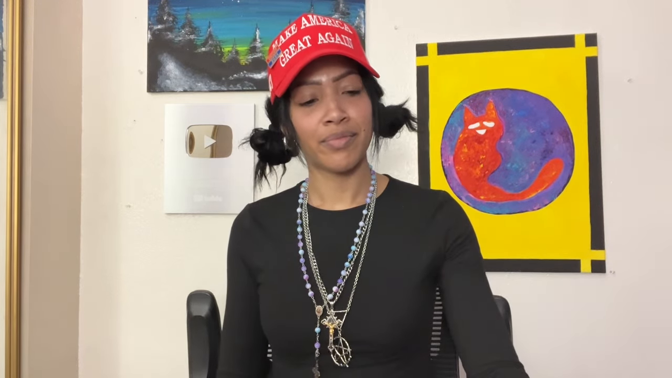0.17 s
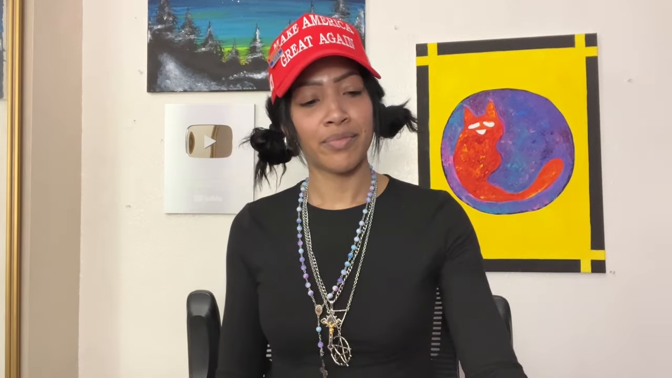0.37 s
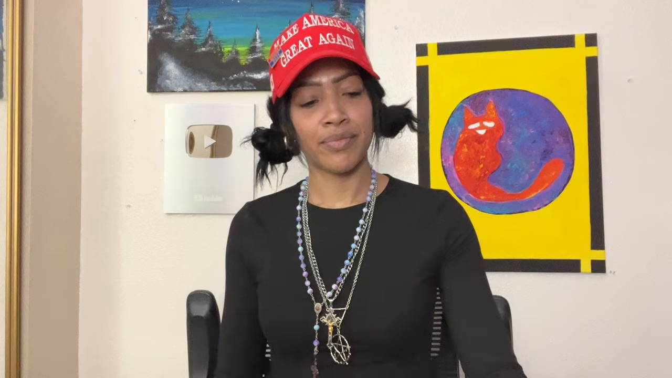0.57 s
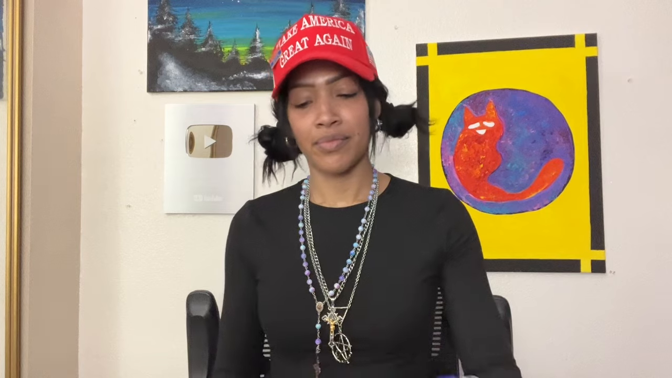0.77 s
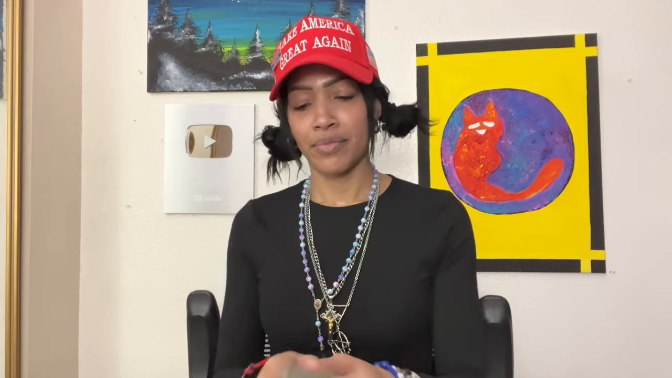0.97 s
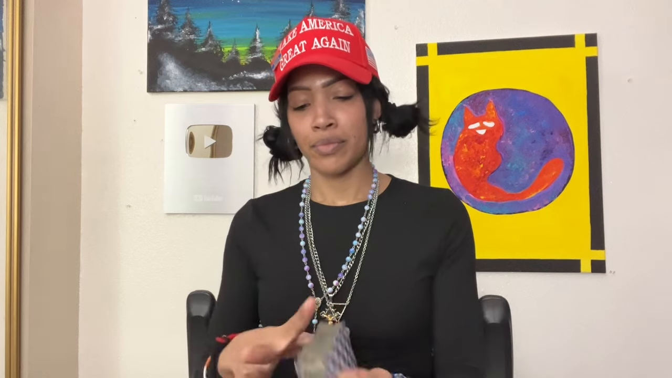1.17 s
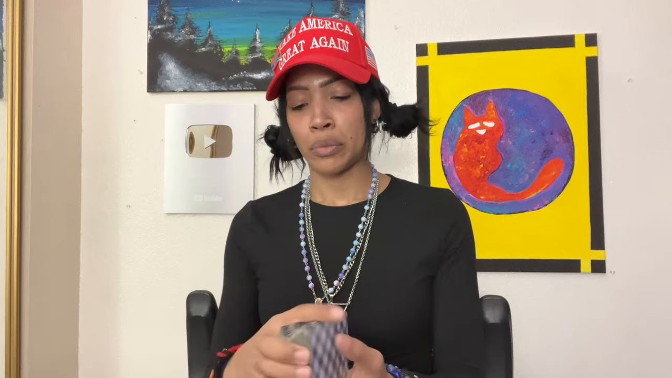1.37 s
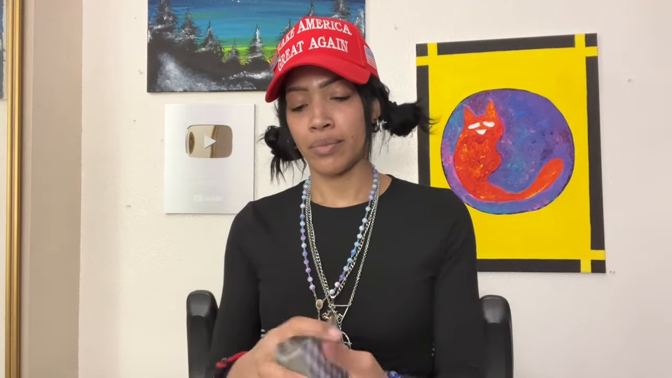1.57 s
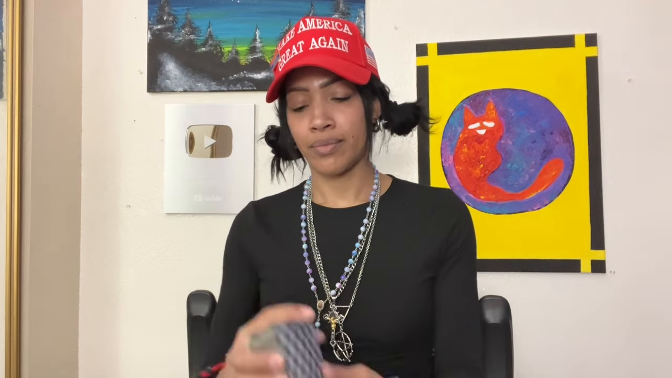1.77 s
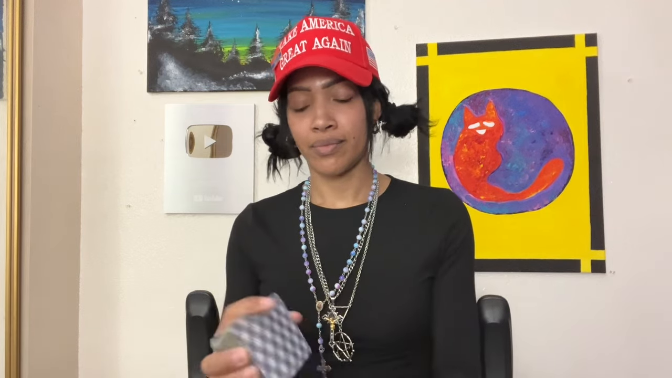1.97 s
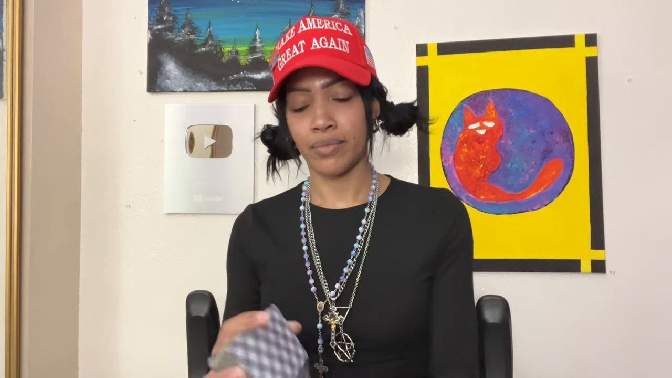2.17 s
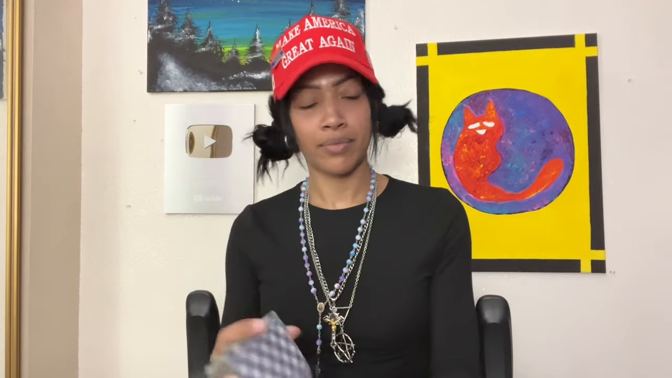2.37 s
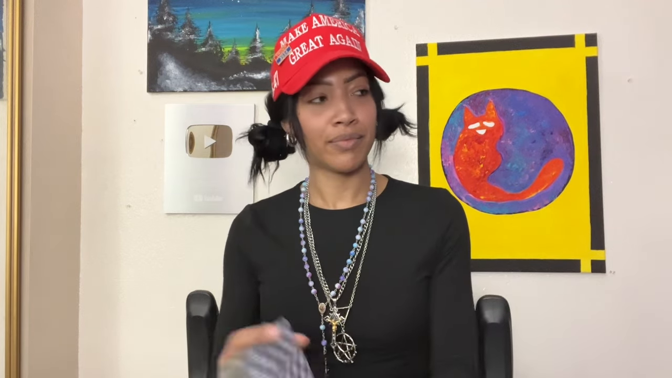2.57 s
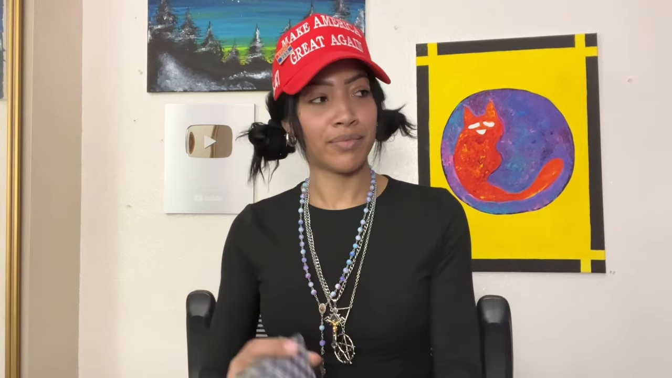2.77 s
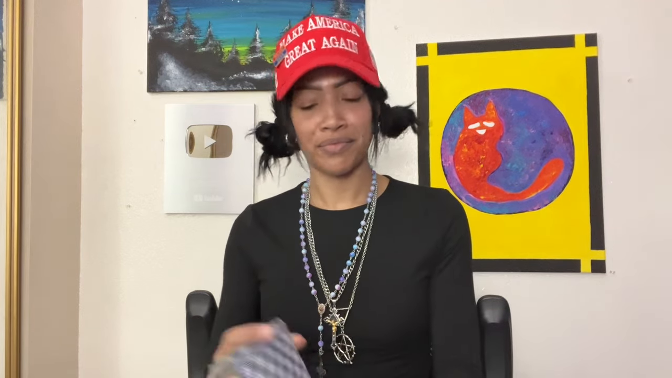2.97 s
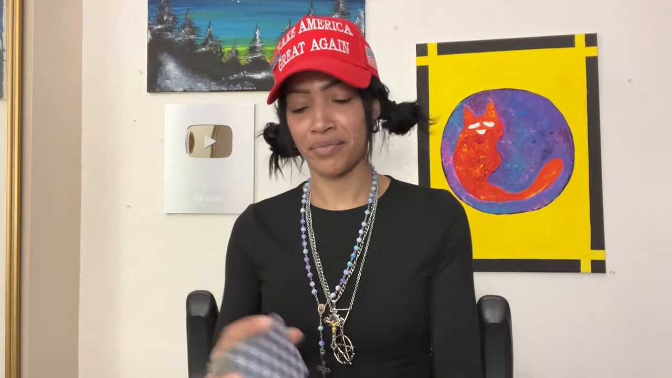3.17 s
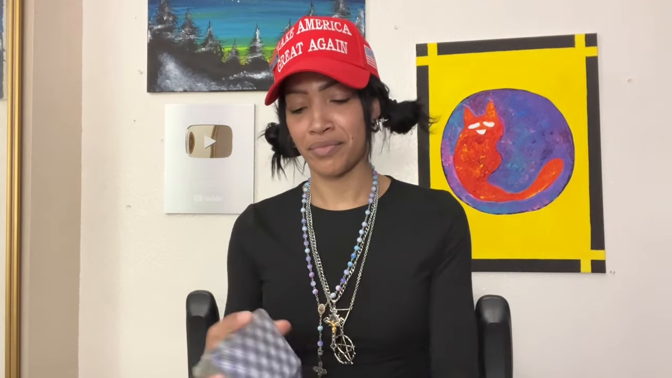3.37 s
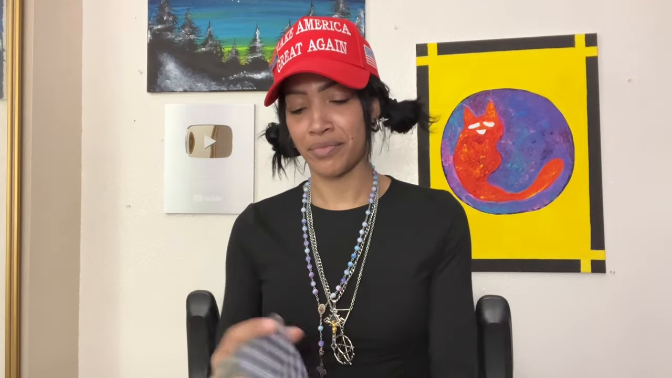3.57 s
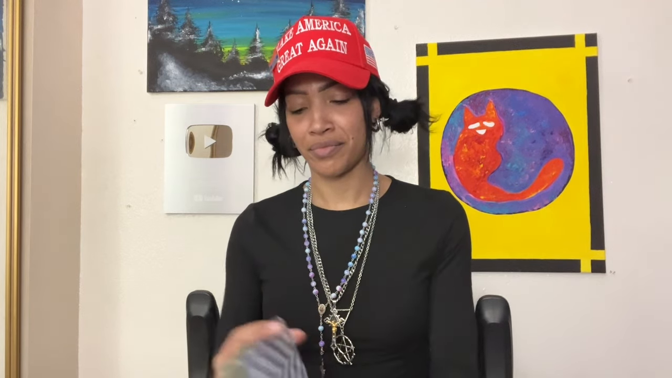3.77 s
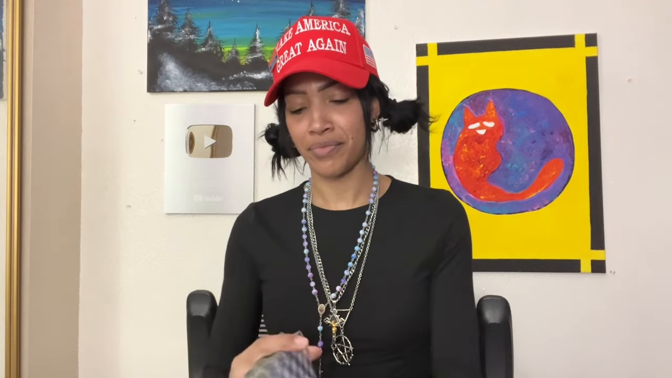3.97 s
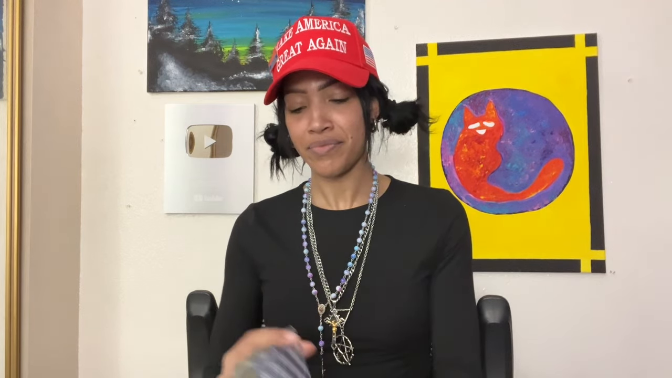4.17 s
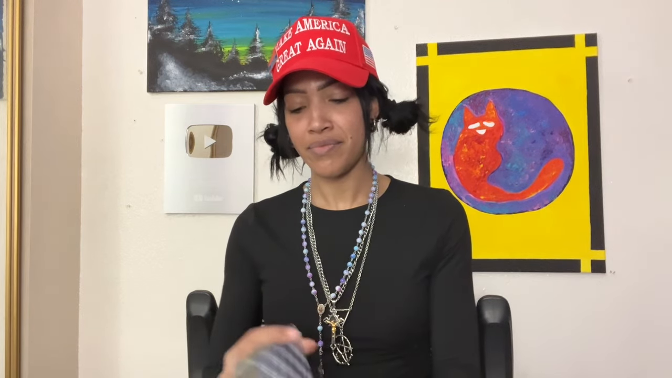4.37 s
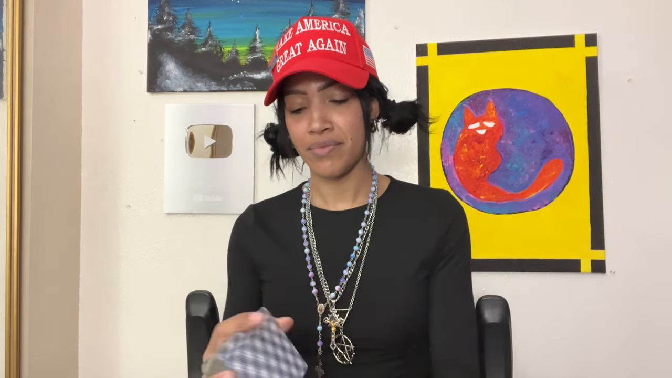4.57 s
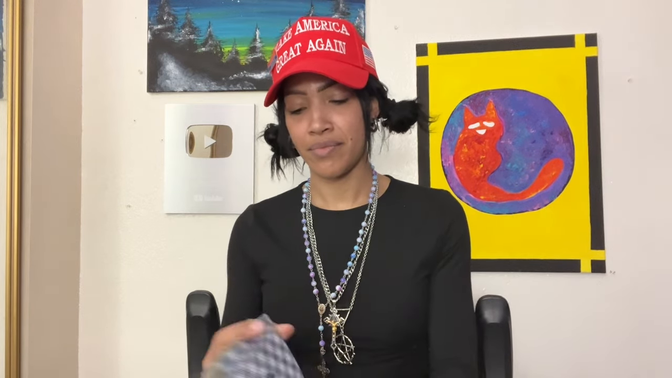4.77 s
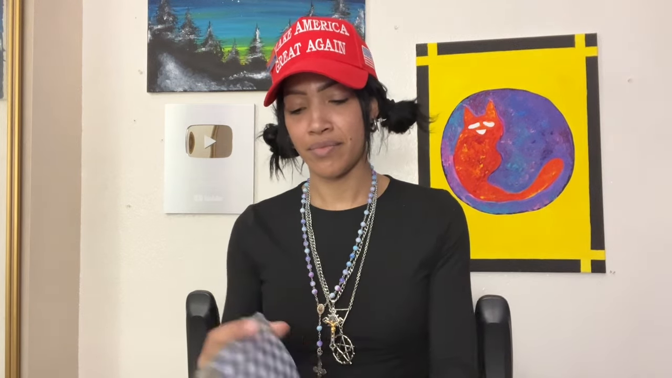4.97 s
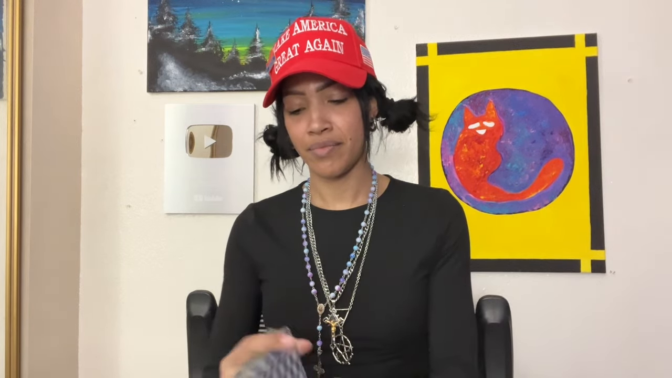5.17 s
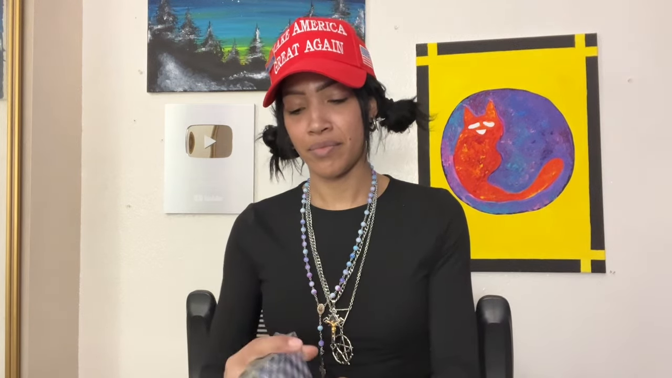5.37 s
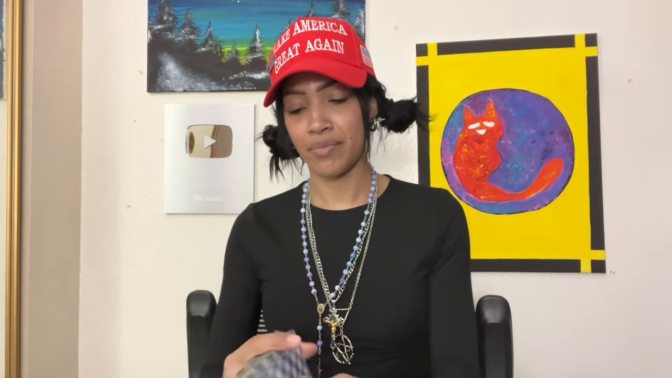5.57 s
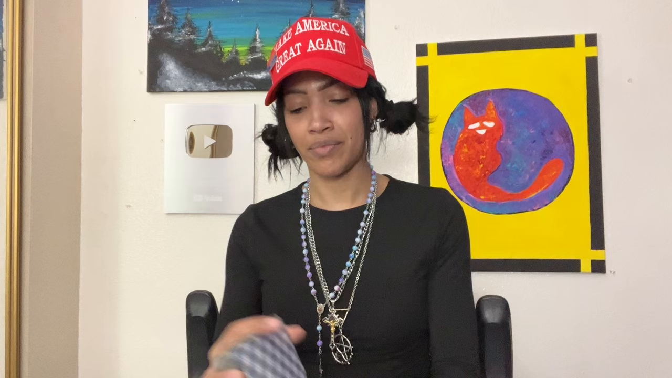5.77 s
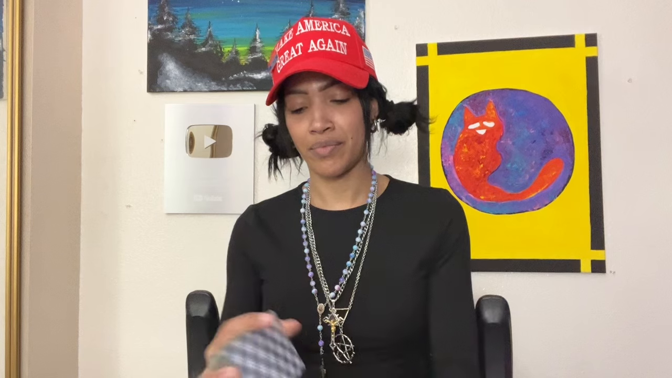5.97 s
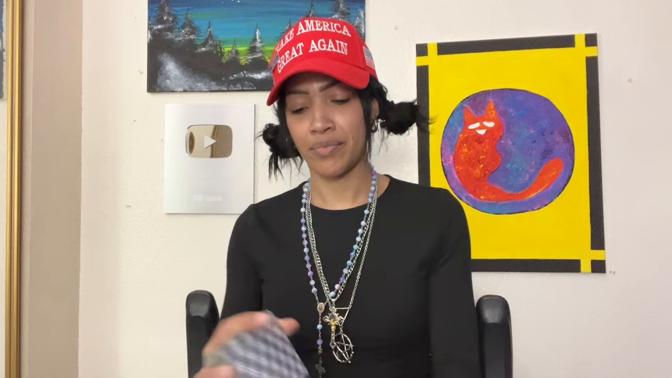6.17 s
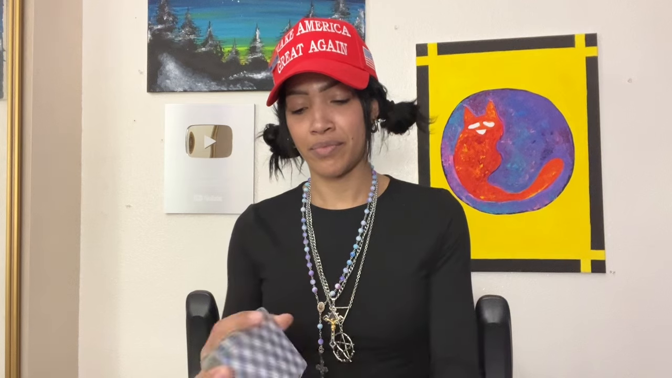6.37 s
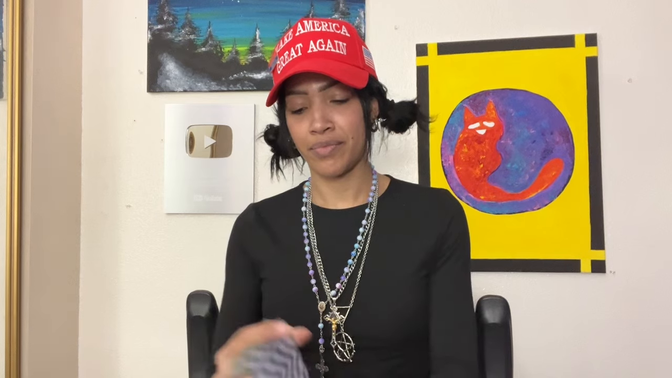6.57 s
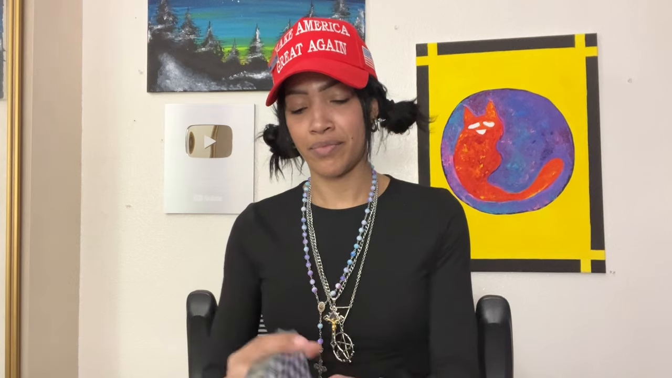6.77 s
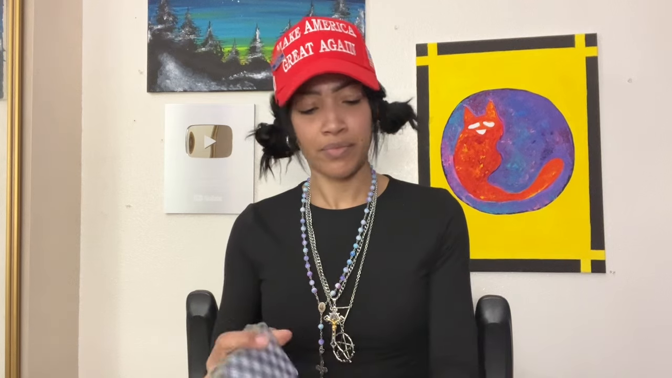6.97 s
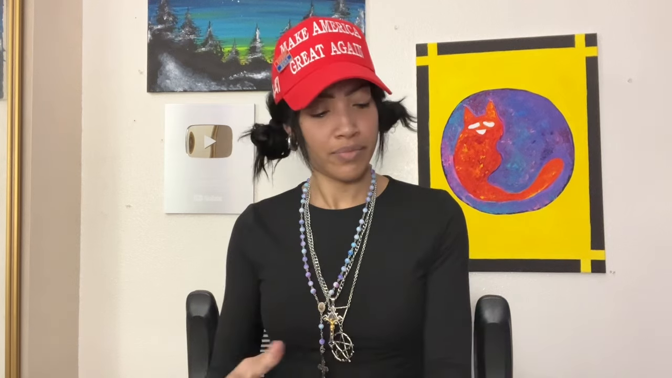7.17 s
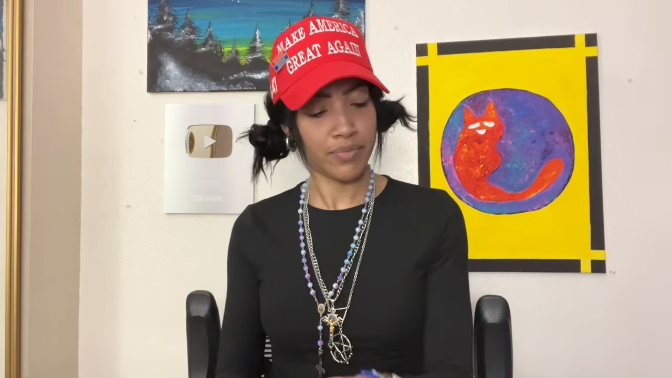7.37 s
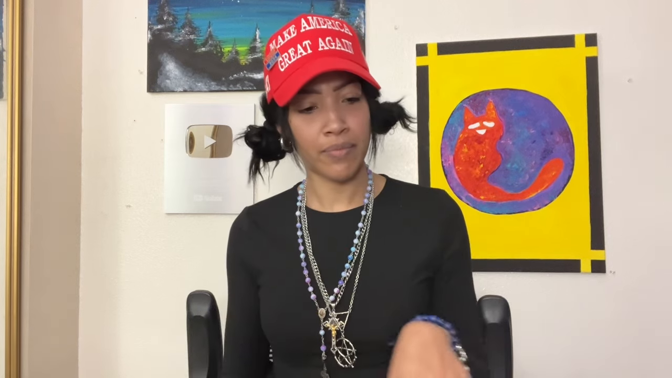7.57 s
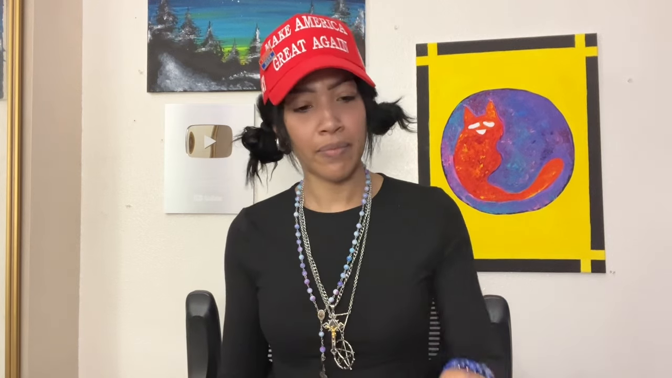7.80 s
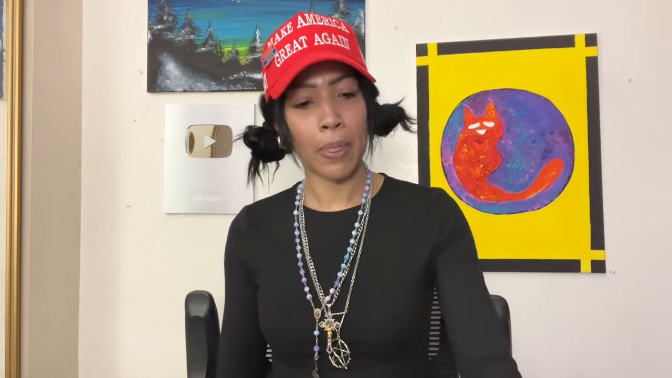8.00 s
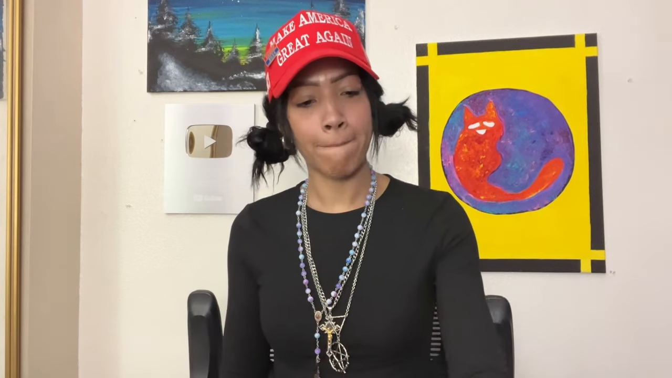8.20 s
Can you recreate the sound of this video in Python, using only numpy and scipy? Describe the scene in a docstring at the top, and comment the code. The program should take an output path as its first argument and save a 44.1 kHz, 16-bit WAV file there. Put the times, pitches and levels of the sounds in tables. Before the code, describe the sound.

Close stereo pickup of a deck of cards handled at a table in a quiet room with a soft low hum. First sparse, faint clicks and rubbing, then louder irregular slaps settling into a steady quick overhand shuffle, with sliding paper hiss, snappy ticks and woody pops. The strokes grow a little stronger, stop with dull bumps, and give way to a few light ticks and a smooth brushing sweep.

```python
"""An appliance hums; card edges tick as a deck is picked up, then it is shuffled overhand about four strokes a second.
In each stroke a packet slides with a hiss of filtered noise, its edges tick as short noise bursts, and it lands
with a hollow slap: a gliding, decaying sine for the trapped air and ringing modes for the table; fingers tick between.
At the end the deck is set down with dull sine knocks and swept across the table with a thin hiss.
A small furnished room answers with an echo and a diffuse tail; a pair of microphone ports listens."""
import sys
import numpy as np
from scipy import signal
from scipy.fft import rfft, irfft
from scipy.io import wavfile
from scipy.ndimage import uniform_filter1d

SR = 44100
rng = np.random.default_rng(int(sys.argv[2]) if len(sys.argv) > 2 else 0)


def unload_wav(signal):
    """Save mono or channel-first audio to the path in sys.argv[1] as 16-bit WAV at rate SR, clipped to [-1, 1]."""
    wavfile.write(
        sys.argv[1],
        SR,
        np.round(np.clip(np.atleast_2d(signal).T, -1, 1) * 32767).astype(np.int16),
    )


N = 363163  # samples

# steady rubbing of the deck in the hands: time_s, treble_db, papery_middle_db
RUBBING = [(.55, -99, -110), (.9, -69, -69), (1.15, -66, -76), (1.31, -67, -72), (1.4, -84, -88),
           (1.6, -69, -65.5), (2.3, -60, -53.5), (2.8, -56, -56), (4.4, -56.5, -57.5), (6.1, -56.5, -54),
           (6.8, -54, -51.5), (7.0, -70, -65), (7.3, -62.5, -63.5), (7.55, -69, -92), (8.23, -75, -67)]
# spectrum of card faces rubbing: frequency_hz, relative_db
FACE_SPECTRUM = [(2000, -22), (3500, -3.5), (5500, -1), (9000, 1.5), (10800, -5), (12500, 1), (14000, 1.5),
                 (15600, 1), (15900, -36), (16500, -40)]
# papery middle of the rubbing: frequency_hz, relative_db
PAPER_SPECTRUM = [(300, -0.5), (600, -1.5), (1200, -6), (2000, -7.5), (3500, -8.5), (6000, -13)]


def undb(db):
    """Amplitude ratio from decibels: 20 dB for each factor of ten."""
    return 10 ** (np.asarray(db) / 20)


def level(x, db):
    """Normalization of the root-mean-square amplitude to a level in dB."""
    return x * undb(db) / np.sqrt(np.mean(x ** 2))


def colour(x, points):
    """Spectral shaping by (Hz, dB) points on a log-frequency axis, with steep 91 dB/octave cut-offs outside."""
    hz, db = np.transpose(points)
    octave = np.log2(np.maximum(np.fft.rfftfreq(x.shape[-1], 1 / SR), 1))
    octaves_below = np.maximum(np.log2(hz[0]) - octave, 0)
    octaves_above = np.maximum(octave - np.log2(hz[-1]), 0)
    gain_db = np.interp(octave, np.log2(hz), db) - 91 * (octaves_below + octaves_above)
    return irfft(rfft(x) * undb(gain_db), x.shape[-1])


def band(x, hz, width_hz):
    """Second-order resonance: its quality factor is centre frequency over bandwidth."""
    return signal.lfilter(*signal.iirpeak(hz, hz / width_hz, SR), x)


def noise():
    """Two uncorrelated noises: what the ports share and what they do not."""
    return rng.standard_normal((2, N))


def walk(rate):
    """Slow random modulation: levels drawn `rate` times a second and slewed; spread near 1."""
    hold = int(SR / rate)
    steps = np.repeat(rng.standard_normal(N // hold + 1), hold)
    return 1.2 * uniform_filter1d(steps, hold)[:N]


def fade(t60_s, rise_s, size=9000):
    """Exponential onset and decay: 60 dB are lost in t60_s, taken as at least 3 ms."""
    t = np.arange(size) / SR
    return (1 - np.exp(-t / rise_s)) * 1000 ** (-t / max(t60_s, .003))


def add(track, s, sound):
    """Superposition of a sound on a track from time s, cut at the end."""
    i = int(s * SR)
    track[..., i:i + sound.shape[-1]] += sound[..., :N - i]


def grit(points, grain_db, patchy_db):
    """Stick-slip friction: dense slips of very unequal size that come in patches of changing colour."""
    # bands of the rubbing that swell each on its own: centre_hz
    tint_hz = (1400, 3200, 7000)
    tint_db = 3.5
    slip_size = np.minimum(uniform_filter1d(rng.exponential(size=N), size=6), 3.)
    slips = noise() * undb(grain_db * slip_size)
    rub = colour(slips, points)
    for hz in tint_hz:
        swell = undb(tint_db * walk(35)) - 1
        rub = rub + swell * band(rub, hz, .7 * hz)
    return level(rub * undb(patchy_db * walk(60)), 0)


def appliance():
    """Broadband and narrow-band noise: soft air, a hum wavering in low room resonances, a faint blurred whine."""
    # air noise spectrum: frequency_hz, relative_db
    air_spectrum = [(15, -61), (30, -44), (44, -5), (97, -6), (134, -0.5), (206, -5), (242, -2), (420, -7),
                    (659, -13.5), (734, -13), (936, -19.5), (1350, -31.5), (1890, -88), (2050, -62),
                    (2220, -57), (16000, -52)]
    # resonances of the hum: centre_hz, width_hz, level_db (before wavering)
    hum_modes = [(59.8, 3.5, -62.5), (152, 4.9, -52), (178, 4.8, -61.5), (237.9, 4.7, -57.5),
                 (303.6, 6.1, -62.5), (3600, 300, -87)]
    # harmonics of the motor's turn rate: multiple, level_db
    whine_lines = [(34, -82), (35, -81), (36, -81), (60, -86)]
    turn_rate_hz, whine_width_hz = 59.06, 12
    hum_waver_db = 2
    own_boost_db = 3  # the appliance is diffuse, so less alike at the ports
    out = level(colour(noise(), air_spectrum), -50) * undb(walk(1.5))
    for hz, width_hz, db in hum_modes:
        out = out + level(band(noise(), hz, width_hz), db) * undb(hum_waver_db * walk(2.9))
    for multiple, db in whine_lines:
        out = out + level(band(noise(), multiple * turn_rate_hz, whine_width_hz), db)
    return out * undb([[0], [own_boost_db]])


def flicks():
    """Random impacts of stray cards, scaled to the treble of the rubbing; rows as for ticks."""
    flicks_per_s, dull_db = 55, -18.
    over_rubbing_db, scatter_db = 9, 3.5
    when, size = rng.random((int(flicks_per_s * N / SR), 2)).T
    s = when * N / SR
    rub_db = np.interp(s, *np.transpose(RUBBING)[:2], left=-120)
    # the scatter only strengthens, and is capped at ln 20
    peak_db = rub_db + over_rubbing_db - scatter_db * np.log(np.maximum(size, 1 / 20))
    return list(zip(s, peak_db, np.full(len(s), dull_db)))


def ticks():
    """Impulsive contact: a short crack of card edges excites a papery flap, then the hiss of cards settling."""
    # card edges tick: start_s, crack_level_db, dull_part_db (relative to the crack)
    edge_ticks = [(0.2806, -53, -9), (0.3341, -54, -14), (0.3726, -51, -21), (0.616, -40, -33),
                  (0.6575, -31, -36), (0.7605, -46, -32), (0.7085, -38, -30), (0.839, -33.5, -38),
                  (0.8846, -29, -37), (0.9, -47, -6), (0.922, -41, -11), (0.9503, -40, -14),
                  (0.968, -38, -10), (0.999, -37, -12), (1.0146, -47, -29), (1.063, -33, -38),
                  (1.075, -33, -33), (1.1107, -39, -11), (1.4393, -44, -15), (1.6374, -32, -4),
                  (1.6568, -34, 1), (1.77, -28, -43), (1.7987, -39, 2), (1.857, -36, -3), (1.894, -30, -15),
                  (1.913, -27, -21), (2.033, -33.5, -28), (2.116, -36, -5), (2.1639, -24, 0.5),
                  (2.1772, -26, -0.5), (2.2686, -24.5, -16), (2.3513, -33, -10), (2.3858, -31, -13),
                  (2.418, -21, -17), (2.4801, -31.5, -13.5), (2.6155, -23, -29), (2.6409, -15.5, -14),
                  (2.7543, -17.5, -12), (2.8906, -19.5, -7), (2.9848, -27, -10.5), (3.126, -16.5, -13.5),
                  (3.2307, -35.5, -6), (3.3769, -15, -15.5), (3.46, -27.5, -3), (3.5999, -20, -9),
                  (3.694, -35, -18), (3.717, -31.5, -4), (3.8428, -17.5, -8.5), (3.9472, -30.5, -8),
                  (3.9908, -35.5, -6), (4.0725, -30, -3.5), (4.0761, -20.5, -21), (4.167, -31, -21),
                  (4.1825, -26.5, -7), (4.2688, -25, -16), (4.295, -19, -5), (4.404, -29, -11),
                  (4.55, -18.5, -11.5), (4.587, -24, -11.5), (4.6478, -21.5, -13.5), (4.774, -40, 4),
                  (4.783, -20.5, -9.5), (4.8632, -27, -16), (4.872, -23, -10.5), (5.0025, -29.5, -7),
                  (5.015, -20.5, -4.5), (5.0995, -26, -11), (5.1472, -32, -16), (5.254, -19.5, -18),
                  (5.3486, -29, -7.5), (5.465, -12.5, -7.5), (5.567, -25.5, -17), (5.7, -16, -13),
                  (5.7028, -30, 2.5), (5.7975, -21.5, -11), (5.888, -36, -30), (5.9167, -10, -16),
                  (6.021, -25.5, -12), (6.094, -31, -28), (6.122, -19, -28), (6.1563, -15.5, -8.5),
                  (6.2525, -24, -14), (6.375, -11.5, -15.5), (6.4832, -23.5, -8.5), (6.6115, -38, -6),
                  (6.6266, -15.5, -11), (6.682, -39, -6), (6.7177, -22.5, -14), (6.8387, -8, -21.5),
                  (6.969, -39, -26), (7.0828, -26, -27), (7.132, -34.5, -1), (7.148, -33, -8),
                  (7.2812, -39, -29), (7.3109, -34, -10), (7.3908, -30.5, -23), (7.4442, -36.5, -37),
                  (7.4786, -30.5, -39), (7.6446, -37, -14.5), (7.7674, -29, -41), (8.1235, -39, -5)]
    # thin crack: frequency_hz, relative_db
    edge_spectrum = [(5500, -1.5), (8000, -1), (12500, 0), (15600, -1), (15900, -2), (16500, -22)]
    # duller part of the crack: frequency_hz, relative_db
    dull_spectrum = [(800, 14.5), (1500, 5.5), (2200, 10), (3000, 10), (5000, 8.5)]
    # flapping card: frequency_hz, relative_db
    flap_spectrum = [(700, -2), (1500, 1), (3000, 12), (4500, -4), (6500, -15)]
    crack_lag_s = .00058  # from first touch to the crack
    burst_energy_db = 13  # whole energy of a burst before its level and colour
    flap_db, flap_t60_s = -12, .089  # relative to the duller part
    # settling grows more slowly than the tick: 0.6839 dB per dB
    settle_db, settle_db_per_db, settle_t60_s, usual_tick_db = -44.5, .6839, .14, -23
    # cards that tick just after the first: mean lag, level below it, further random weakening
    stragglers, straggle_s, straggle_db, straggle_scatter_db = 3, .008, -9, 4

    rows = list(edge_ticks) + flicks()
    late, weak = rng.exponential(size=(2, len(rows), stragglers))
    followers = []
    for (s, db, dull_db), lags, losses in zip(rows, late, weak):
        for lag, loss in zip(lags, losses):
            follower_db = db + straggle_db - straggle_scatter_db * loss
            followers.append((s + straggle_s * lag, follower_db, dull_db))
    rows += followers

    crack, dull = np.zeros((2, N)), np.zeros((2, N))
    bursts = rng.standard_normal((len(rows), 2, 256)) * fade(.003, .0002, size=256)
    bursts *= undb(burst_energy_db) / np.sqrt(np.sum(bursts ** 2, axis=2, keepdims=True))
    for (s, db, dull_db), burst in zip(rows, bursts):
        crack_s = min(s + crack_lag_s, N / SR)
        add(crack, crack_s, undb(db) * burst)
        add(dull, crack_s, undb(db + dull_db) * burst)

    flap, settle = np.zeros(N), np.zeros(N)
    for s, db, dull_db in edge_ticks:
        add(flap, s, undb(db + dull_db + flap_db) * fade(flap_t60_s, .003))
        hiss_db = settle_db + settle_db_per_db * (db - usual_tick_db)
        add(settle, s, undb(hiss_db) * fade(settle_t60_s, .002))
    hiss = grit(FACE_SPECTRUM, grain_db=6, patchy_db=2.5)
    flutter = grit(flap_spectrum, grain_db=7, patchy_db=3.5)
    return colour(crack, edge_spectrum) + colour(dull, dull_spectrum) + flap * flutter + settle * hiss


def rustle():
    """Sustained friction: faces rub all the while the deck is handled, treble and middle varying apart."""
    s, treble_db, middle_db = np.transpose(RUBBING)
    t = np.arange(N) / SR
    treble = grit(FACE_SPECTRUM, grain_db=11.0, patchy_db=3.5)
    middle = grit(PAPER_SPECTRUM, grain_db=6.0, patchy_db=4.5)
    treble_gain = undb(np.interp(t, s, treble_db, left=-120))
    middle_gain = undb(np.interp(t, s, middle_db, left=-120))
    return treble * treble_gain + middle * middle_gain


def slides():
    """Sliding friction under an envelope: noise of the faces swells, sags while the slide lasts and stops."""
    # a packet or hand slides over card faces: start_s, swell_s, hold_s, level_db, sheen_db (relative)
    slide_strokes = [(0.597, 0.034, 0.1, -53.5, -4), (0.847, .005, 0.033, -71, -8),
                     (.883, .018, 0.063, -57, -15), (0.99, 0.013, 0.063, -52, 8),
                     (1.058, 0.019, 0.053, -53, 6), (1.586, 0.052, 0.026, -45.5, -17),
                     (1.792, 0.015, 0.023, -38, -27), (1.876, 0.026, 0.027, -38, -1),
                     (2.037, 0.0057, .028, -44, -16), (2.115, 0.051, 0.049, -36, -28),
                     (2.366, 0.032, 0.035, -36, -5), (2.602, 0.018, 0.015, -38.5, 15),
                     (2.634, 0.0035, 0.049, -33.5, -12), (2.833, 0.041, 0.021, -38, -21),
                     (3.091, 0.0081, 0.024, -39.5, 10), (3.329, 0.014, 0.028, -37.5, 6),
                     (3.559, 0.011, 0.045, -39, 5.5), (3.791, 0.022, 0.045, -37, 8),
                     (4.026, 0.022, 0.022, -35.5, -30), (4.261, 0.0094, 0.034, -37.5, 3),
                     (4.499, 0.021, 0.049, -36.5, 2), (4.722, 0.048, .009, -38.5, -29),
                     (4.952, 0.06, 0.013, -36.5, -17), (5.19, 0.02, 0.049, -32, -12),
                     (5.423, 0.016, 0.065, -37, 3), (5.655, 0.026, 0.0063, -36, -21),
                     (5.882, 0.007, 0.034, -37, 11), (6.107, 0.017, 0.042, -41, 15.5),
                     (6.339, 0.013, 0.017, -44, 19), (6.568, 0.066, 0.0081, -34.5, -16),
                     (6.786, 0.05, 0.0083, -36, -22), (7.056, 0.03, 0.043, -40.5, -21),
                     (7.128, .005, 0.024, -40.5, -20), (7.369, 0.012, 0.039, -50, -16),
                     (7.442, 0.019, 0.11, -58.5, 7)]
    swell_db, sag_db = 20.5, 10.5
    release_s, release_db = .0044, 66
    middle_db = -11
    sheen_hz, sheen_width_hz = 11540, 3300
    push, sheen = np.zeros(N), np.zeros(N)
    for s, swell_s, hold_s, db, sheen_db in slide_strokes:
        t = np.arange(int((swell_s + hold_s + release_s) * SR)) / SR
        corners_s = np.cumsum([0, swell_s, hold_s, release_s])
        drop_db = np.interp(t, corners_s, [swell_db, 0, sag_db, sag_db + release_db])
        shape = undb(db - drop_db)
        add(push, s, shape)
        add(sheen, s, shape * undb(sheen_db))
    face = grit(FACE_SPECTRUM, grain_db=6, patchy_db=3.5)
    middle = undb(middle_db) * grit(PAPER_SPECTRUM, grain_db=-14, patchy_db=-3.0)
    return push * (face + middle) + sheen * band(face, sheen_hz, sheen_width_hz)


def air_pocket(hz):
    """Damped oscillation of squeezed air: it starts bright, at 1.6 times its pitch, and falls to it."""
    decay_cycles, rise_cycles, glide_cycles = 5.5, .4, .3
    t = np.arange(1500) / SR
    cycles = hz * t + glide_cycles * (1 - np.exp(-2 * hz * t))
    return fade(decay_cycles / hz, rise_cycles / hz, size=1500) * np.sin(2 * np.pi * cycles)


def slaps():
    """Impact and modal response: air squeezed from between packets pops, rings the table, and loose cards rattle."""
    # packets land on the deck, the deck on the table: start_s, peak_db, pitch_hz, after_db (ring and rattle)
    landings = [(1.639, -27, 910, 3), (1.857, -44, 369, 6), (1.902, -31.5, 660, 1),
                (1.914, -26.5, 920, -5.5), (2.165, -24.5, 1240, 2), (2.407, -39, 1010, 1),
                (2.417, -32, 500, 9.5), (2.626, -38, 1640, 1), (2.64, -22, 1110, 1), (2.754, -31, 820, -8),
                (2.88, -25.5, 850, -3), (2.89, -23.5, 850, -12), (2.985, -37.5, 810, 4),
                (3.114, -29, 650, 7), (3.128, -25, 1170, -3.5), (3.374, -27.5, 915, -2),
                (3.582, -34.5, 412, 5.5), (3.599, -28.5, 1000, -2), (3.827, -34, 640, 4),
                (3.841, -23.5, 750, -15), (4.059, -35.5, 784, 8), (4.075, -32, 1070, -9),
                (4.281, -38, 636, 5.5), (4.295, -19.5, 1040, -2), (4.533, -39, 360, 3),
                (4.55, -24.5, 1180, -7.5), (4.647, -31.5, 905, -6), (4.774, -24.5, 1780, -6),
                (4.781, -34, 480, -20), (5.005, -33, 640, -12), (5.015, -26.5, 1210, -1),
                (5.099, -37, 900, -4), (5.247, -31, 1290, 2), (5.347, -39.5, 479, 8.5),
                (5.454, -27, 980, -5), (5.463, -15.5, 1220, -3.5), (5.575, -43.5, 490, 12),
                (5.7, -26.5, 1120, -5), (5.704, -26.5, 500, -1), (5.917, -23.5, 700, -5),
                (5.921, -24.5, 1280, 1), (6.02, -42, 450, 5), (6.142, -36, 659, 7.5), (6.155, -17, 1140, 1),
                (6.256, -38.5, 485, 7), (6.364, -25, 696, 2), (6.375, -11, 1130, -4),
                (6.484, -32.5, 1000, -7), (6.626, -28.5, 810, -26), (6.682, -36, 513, -6),
                (6.716, -40, 910, 9), (6.771, -28.5, 390, -9), (6.828, -37, 790, -4),
                (6.838, -23.5, 2110, 0.5), (6.882, -36, 400, -6), (7.131, -31.5, 563, 5)]
    # the table top's modes: frequency_hz, relative_db, t60_s
    table_modes = [(450, -3, 0.054), (601, -60, 0.2), (820, -17, 0.44), (1160, -21, .1), (1223, 6.5, 0.048),
                   (1380, -11, 0.1), (1584, 3.5, 0.096), (1680, -16, .12), (2200, -1.5, 0.18)]
    # rattle of loose cards: frequency_hz, relative_db
    loose_spectrum = [(400, 4), (700, 1.5), (1200, -1.5), (1700, -4), (2500, -7.5), (4000, -10.5),
                      (6000, -13)]
    pop_lag_s = .001807  # the pop trails the first touch
    ring_db = -44.5
    # the rattle grows more slowly than the slap: 0.8534 dB per dB
    rattle_db, rattle_db_per_db, rattle_t60_s, usual_slap_db = -39, .8534, .07, -31.5
    # smaller pockets close after the first, mostly higher in pitch
    after_pops, after_s, after_octaves, after_pop_db = 5, .014, .55, -10

    pop, strike, rattle = np.zeros((3, N))
    lates = rng.exponential(size=(len(landings), after_pops))
    shifts = rng.standard_normal((len(landings), after_pops))
    for (s, db, hz, after_db), late, shift in zip(landings, lates, shifts):
        pop_s = s + pop_lag_s
        pocket = air_pocket(hz)
        puff = undb(db) * pocket / pocket.max()
        add(pop, pop_s, puff)
        add(strike, pop_s, undb(after_db) * puff)
        for lag_s, small_hz in zip(after_s * late, hz * 2 ** (after_octaves * (shift + 1))):
            small_db = db + after_db + after_pop_db - 60 * lag_s / rattle_t60_s
            add(pop, pop_s + lag_s, undb(small_db) * air_pocket(small_hz))
        loose_db = after_db + rattle_db + rattle_db_per_db * (db - usual_slap_db)
        add(rattle, pop_s, undb(loose_db) * fade(rattle_t60_s, .0018))

    t = np.arange(9000) / SR
    modes = np.zeros((2, 9000))
    for hz, db, t60_s in table_modes:
        phase = rng.random((2, 1))  # radians over 2 pi
        modes += undb(db) * fade(t60_s, .0042) * np.cos(2 * np.pi * (hz * t + phase))
    ring = signal.fftconvolve(strike[None], modes, axes=1)[:, :N] * undb(ring_db)
    loose = grit(loose_spectrum, grain_db=6, patchy_db=3.5)
    shared_pop = pop * np.array([[1], [0]])  # alike at both ports
    return shared_pop + ring + rattle * loose


def thumps():
    """Damped low-frequency oscillation: dull knocks as the deck bumps the table, in the shared sound only."""
    # the deck bumps the table: start_s, level_db, pitch_hz
    bumps = [(5.707, -36, 93), (5.926, -41, 91), (6.783, -32.5, 164), (6.805, -36, 232), (6.84, -32, 144),
             (6.885, -39.5, 264), (7.75, -40, 50)]
    t = np.arange(9000) / SR
    out = np.zeros((2, N))
    for s, db, hz in bumps:
        add(out[0], s, undb(db) * fade(.12, .0019) * np.sin(2 * np.pi * hz * t))
    return out


def sweep():
    """Smooth sliding friction: an even, thin hiss of cards gliding over the table."""
    # the deck is swept across the table: time_s, level_db
    sweep_course = [(7.63, -102), (7.65, -49), (7.8, -48.5), (7.97, -48), (8.06, -61), (8.13, -54.5),
                    (8.2, -74)]
    # cards rubbing on the table: frequency_hz, relative_db
    rub_spectrum = [(2500, -29), (4000, -10), (5800, 0), (8000, -1), (11500, -1), (14000, -2), (15600, -28),
                    (15900, -26)]
    s, db = np.transpose(sweep_course)
    gain = undb(np.interp(np.arange(N) / SR, s, db, left=-120))
    return grit(rub_spectrum, grain_db=6.0, patchy_db=0.0) * gain


def room(x):
    """Reflection and reverberation: a bounce off the table, then a diffuse tail with its own length in each band."""
    # reverberation bands: centre_hz, t60_s, energy_db (8.5 below the tail's energy)
    tail_bands = [(695, 0.15, -22.5), (2800, 0.26, -25), (8600, 0.43, -27.5)]
    echo_s, echo_db = .0075, -15
    echo = np.roll(band(x, 1020, 2100), int(echo_s * SR), axis=1)
    out = x + undb(echo_db) * echo
    for hz, t60_s, db in tail_bands:
        tail = band(rng.standard_normal((2, 18000)), hz, 2.1 * hz) * fade(t60_s, .0018, size=18000)
        tail *= undb(db + 8.5) / np.sqrt(np.sum(tail ** 2, axis=1, keepdims=True))
        out = out + signal.fftconvolve(x, tail, axes=1)[:, :N]
    return out


def scene():
    """Superposition: the cards sound in the room; the knocks and the appliance bypass its echo and tail."""
    cards = ticks() + rustle() + slides() + slaps() + sweep()
    return appliance() + room(cards) + thumps()


def record(dry):
    """Interchannel coherence: ports mix shared and own sound with phase lead and balance; the top is cut."""
    # the two ports: frequency_hz, left_lead_rad, likeness (0-1), left_minus_right_db
    port_pair = [(40, 0, 1, 0.5), (100, -0.4, 0.92, -1.5), (207, 0.5, 0.97, -2), (615, 0, 0.29, 0),
                 (1025, 0.7, 0.04, 0), (1260, -0.6, 0.44, -1), (2360, -1.38, 0.76, -0.5),
                 (4430, -2, 0.35, -4.5), (5690, -1, 0, -5.5), (7740, -4, 1, -4), (10060, -1, 0.29, 3),
                 (10200, -1.5, 1, -2), (13570, 1.5, 1, 1), (14400, 3.5, 1, -1.5), (16400, 3, 1, 1)]
    top_hz = 16500
    hz, lead, like, pan_db = np.transpose(port_pair)
    f = np.fft.rfftfreq(N, 1 / SR)
    lead = np.interp(f, hz, lead)
    like = np.interp(f, hz, np.clip(like, 0, 1))
    pan_db = np.interp(f, hz, pan_db)
    shared, own = rfft(dry) * np.sqrt([1 + like, 1 - like]) / np.sqrt(2)
    turn = np.exp(.5j * lead) * undb(pan_db / 2)  # half the difference to each port
    pair = irfft([(shared + own) * turn, (shared - own) / turn], N)
    low_pass = signal.ellip(8, .2, 70, top_hz, fs=SR, output="sos")
    return signal.sosfilt(low_pass, pair)


dry = scene()
out = record(dry)
unload_wav(out)
```